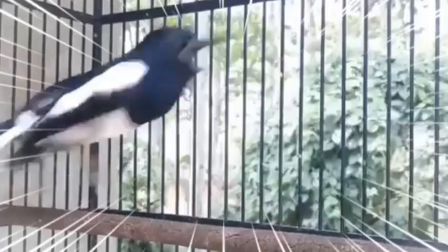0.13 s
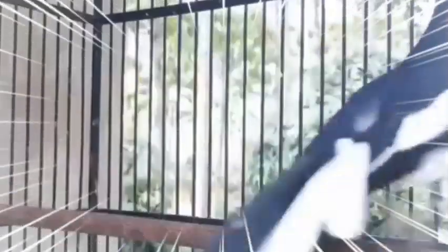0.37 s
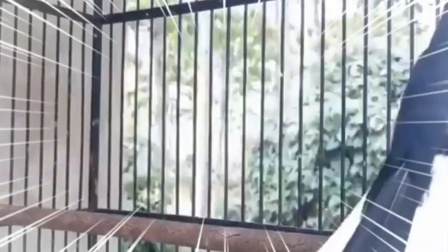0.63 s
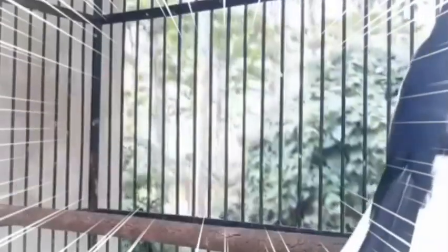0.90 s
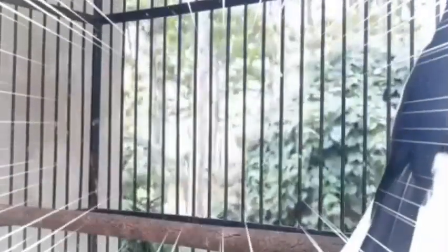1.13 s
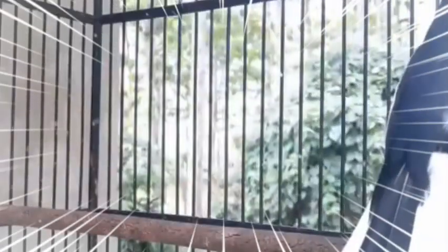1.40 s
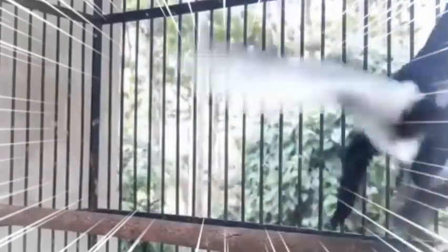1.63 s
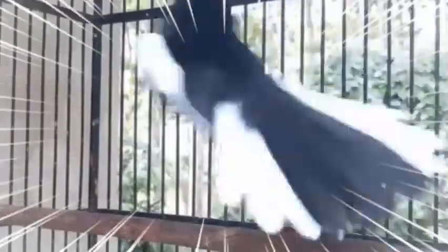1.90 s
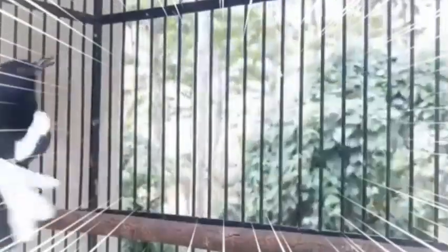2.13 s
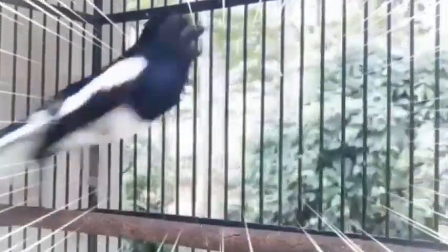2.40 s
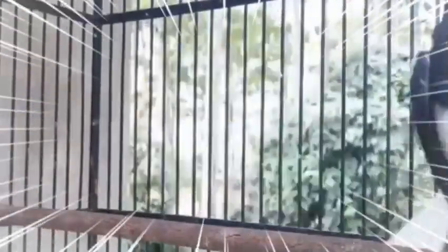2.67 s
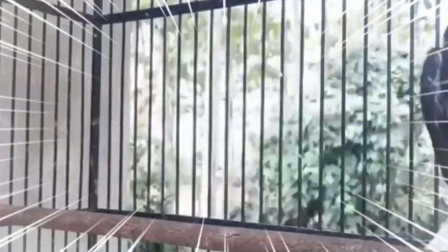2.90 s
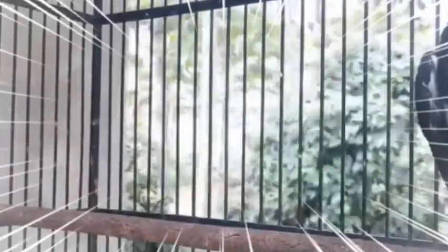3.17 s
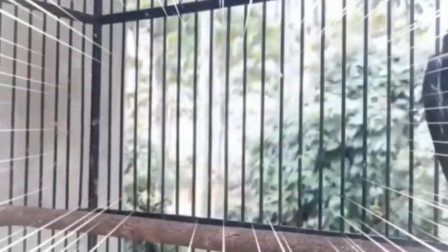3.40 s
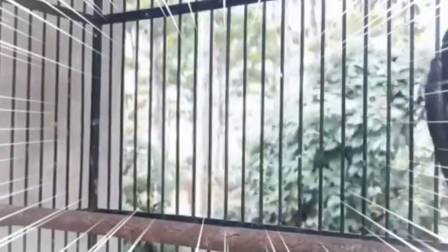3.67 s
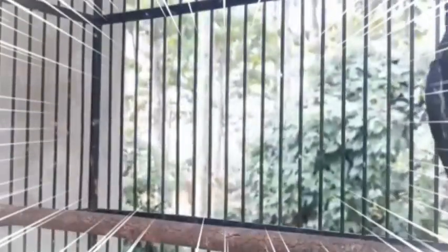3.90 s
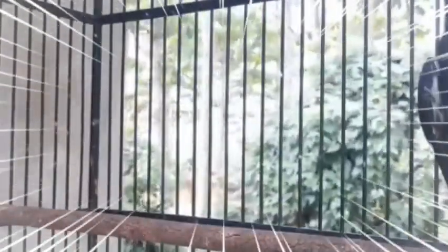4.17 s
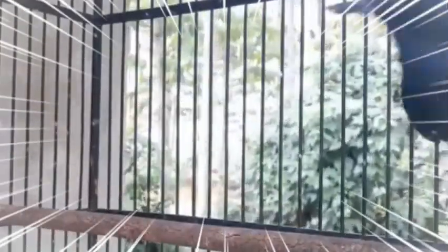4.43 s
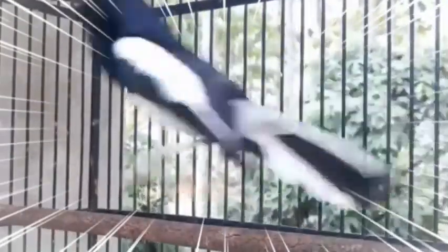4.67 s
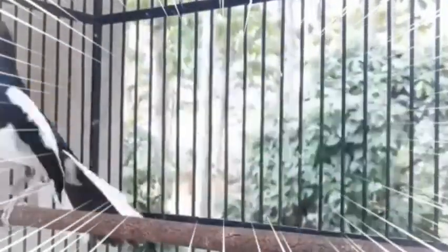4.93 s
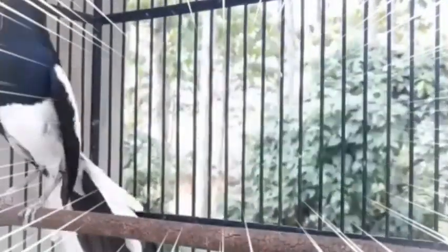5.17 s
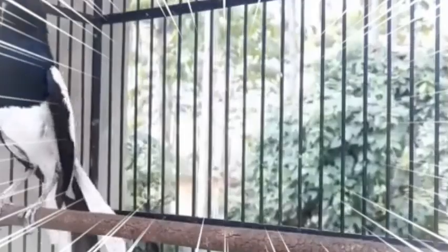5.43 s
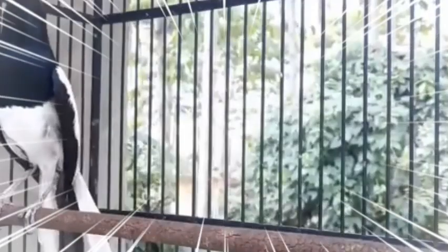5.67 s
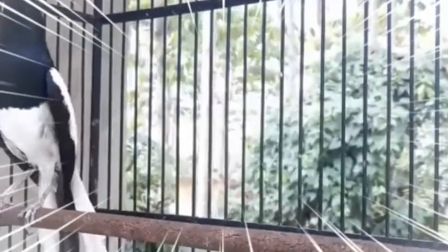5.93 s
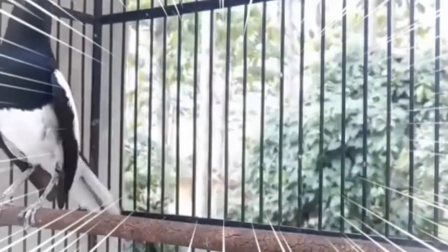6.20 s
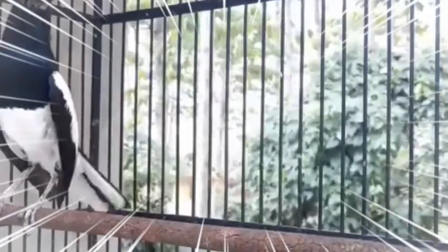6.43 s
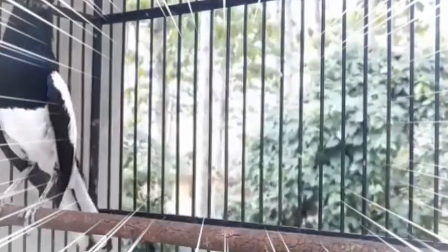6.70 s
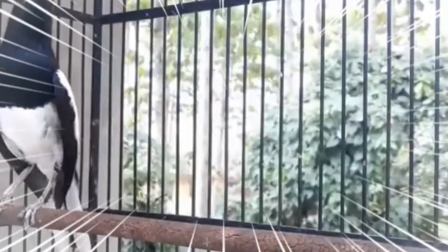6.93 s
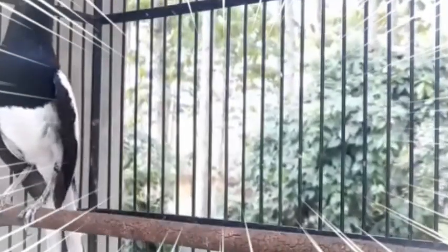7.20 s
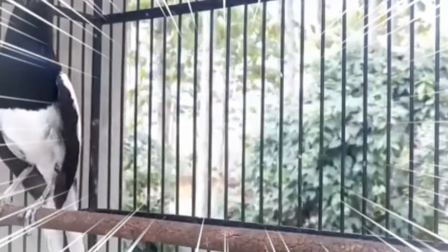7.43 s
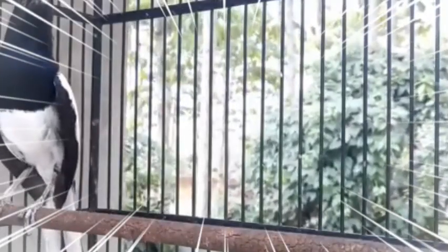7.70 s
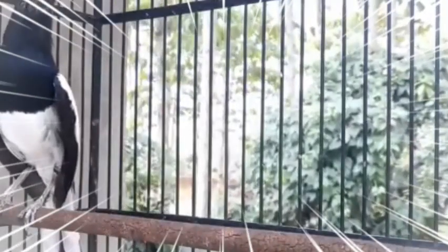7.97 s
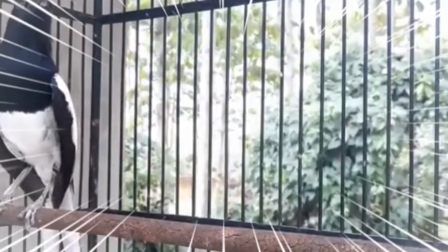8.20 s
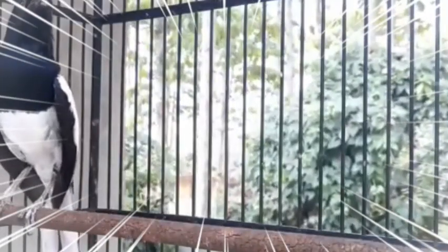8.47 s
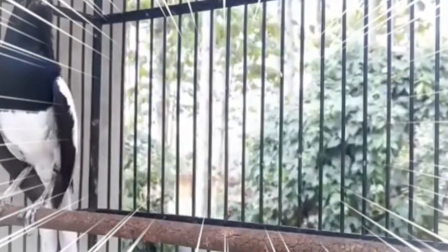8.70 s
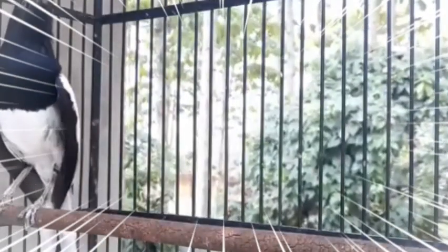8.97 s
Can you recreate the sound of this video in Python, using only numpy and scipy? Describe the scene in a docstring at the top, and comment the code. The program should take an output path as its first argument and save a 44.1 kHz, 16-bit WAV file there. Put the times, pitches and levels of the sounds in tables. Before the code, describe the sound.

After a split second of silence, a small songbird close to the microphone bursts into hoarse notes and sharp whistles under a fading high hiss. A regular row of scratchy rasps follows, then falling slurs, rapid trills and dry chacks. Winding whistles, a warble and a faint perch thump lead to more slurs and rasps. A quiet yard with short echo and low hum lies behind; the loudest notes slightly overload.

```python
"""After a moment of silence a caged songbird sings close by, both sides of its voice box at work: hoarse notes
and whistles under a fading hiss, arched rasps, then slurs, trills and harsh chacks. Winding whistles, hooked notes,
a warble, a perch thump and upsweeps follow, then more slurs and rasps; overlapping lines sound like a second bird.
Voices are near sines on drawn pitch curves; rasps add noise, chacks are noise through drifting resonances. Far notes,
cooing, hum and a yard's short echo lie behind throughout; the loudest notes overload the input."""
import sys
import numpy as np
from scipy import signal
from scipy.fft import rfft, irfft
from scipy.io import wavfile
from scipy.ndimage import uniform_filter1d

SR = 44100
rng = np.random.default_rng(int(sys.argv[2]) if len(sys.argv) > 2 else 0)


def ratio(d):
    """dB to gain"""
    e = np.asarray(d, float) / 20
    return 10 ** e


def pcm_store(signal):
    """Save signal as 16-bit PCM."""
    levels = np.round(np.clip(np.atleast_2d(signal), -1, 1) * 32767)
    wavfile.write(sys.argv[1], SR, levels.astype(np.int16).T)


N = 400869  # length [samples]

# whistles that slide and swell: (time [s], length [s], from [Hz], to [Hz], last level [dB], second harmonic [dB])
SWELLS = [(0.888, 0.058, 2995, 3780, -19.5, -31), (2.274, 0.1, 4880, 3370, -12, -21.5),
          (2.663, 0.16, 1300, 2200, -29.5, 4.5), (2.68, 0.083, 2830, 3670, -20.5, -6),
          (3.862, 0.078, 2220, 1996, -16, -33), (4.246, 0.16, 2585, 2836, -17.5, -19.5),
          (8.946, 0.057, 2050, 1876, -16.5, -15)]
# whistles that scoop onto a pitch: (time [s], length [s], from [Hz], held [Hz], level [dB], second harmonic [dB])
HOLDS = [(0.244, 0.056, 3050, 2842, -10, -8), (0.343, 0.036, 2580, 3420, -11, -20),
         (0.647, 0.052, 2610, 2790, -29, 3), (2.825, 0.13, 3600, 3906, -21, -17),
         (4.023, 0.094, 1670, 1829, -17.5, -23), (4.124, 0.25, 3490, 3700, -34, -47),
         (7.787, 0.13, 2145, 2062, -16, -39)]
# chirps that die away: (time [s], length [s], from [Hz], to [Hz], peak level [dB], second harmonic [dB])
CHIRPS = [(0.773, 0.079, 2896, 3046, -15.5, -11), (1.968, 0.095, 2770, 3120, -11.5, -12),
          (2.074, 0.078, 4440, 4980, -7.5, -30), (2.09, 0.082, 2855, 3335, -14.5, -34.5),
          (3.01, 0.051, 2633, 2723, -11, -20), (3.147, 0.049, 1970, 2116, -11.5, -32),
          (8.539, 0.061, 2200, 2020, -9.5, -30)]
# whistles arching like a thrown stone: (time [s], length [s], from [Hz], top [Hz], to [Hz], level [dB])
ARCHES = [(3.802, 0.046, 2266, 2400, 2220, -12.5), (5.486, 0.075, 2487, 3176, 2410, -9),
          (8.38, 0.087, 2606, 2763, 2254, -11.5), (8.911, 0.042, 2500, 3208, 2750, -6.5)]
# plain slides at one level: (time [s], length [s], from [Hz], to [Hz], level [dB])
SLIDES = [(5.052, 0.014, 5700, 4300, -8.5), (3.2, 0.028, 2343, 2420, -17),
          (3.097, 0.055, 2520, 2100, -22.5), (8.275, 0.039, 2420, 2097, -13.5)]
# sudden two-voiced drops: (time [s], upper from [Hz], lower from [Hz], level [dB])
DROPS = [(7.203, 3990, 2324, -13), (7.483, 3770, 2220, -12), (7.738, 3300, 2200, -13)]
# winding whistles: (second harmonic [dB], rows of (time [s], pitch [Hz], level [dB]))
PHRASES = [(-32, [(.145, 4776, -5.5), (.217, 4680, -8), (.228, 4800, -20)]), (-18, [(.135, 2450, -23),
           (.155, 2470, -17.5), (.175, 2650, -43)]), (-25, [(.672, 4200, -14), (.685, 4720, -22.5),
           (.7, 4596, -11.5), (.735, 4650, -10)]), (-22.5, [(4.475, 3443, -25.5), (4.52, 3460, -11.5),
           (4.67, 3516, -19.5), (4.77, 3389, -9), (4.812, 3362, -19.5)]), (-31.5, [(6.415, 4824, -17.5),
           (6.471, 4740, -6.5), (6.69, 4713, -11.5)]), (-19, [(8.67, 2077, -36), (8.702, 2696, -11.5),
           (8.742, 2765, -9.5), (8.758, 2480, -12.5)]), (-22.5, [(8.835, 1583, -48), (8.863, 2170, -15),
           (8.875, 2534, -18), (8.919, 2290, -16.5), (8.935, 1940, -40)]), (-9.5, [(4.91, 2965, -29),
           (5.006, 2870, -18.5), (5.198, 2924, -24.5)]), (-28.5, [(1.925, 4500, -4), (1.945, 4860, -9.5),
           (1.953, 4000, -20), (1.973, 3810, -3), (1.993, 3830, -59)]), (7, [(2.38, 2327, -19),
           (2.416, 2183, -27.5), (2.488, 2360, -21)]), (-14.5, [(2.485, 3630, -18), (2.509, 4186, -22.5),
           (2.573, 3970, -16.5), (2.601, 3730, -40), (2.629, 4200, -8.5), (2.641, 4680, -18)]),
           (-11, [(5.14, 1599, -46), (5.18, 1917, -20), (5.224, 2315, -25.5), (5.268, 2990, -20),
           (5.396, 3152, -24), (5.656, 3250, -28), (5.745, 3357, -31), (5.79, 3200, -30.5),
           (6.172, 3726, -35), (6.24, 3790, -26.5), (6.3, 3604, -30), (6.36, 3900, -31), (6.412, 3675, -7),
           (6.45, 3810, -28.5), (6.608, 3700, -35)]), (-20.5, [(6.62, 4445, -11), (6.716, 4075, -15),
           (6.756, 3686, -12), (6.816, 3657, -10.5), (6.868, 3685, -56)]), (-19.5, [(8.025, 3400, -10.5),
           (8.065, 3655, -9.5), (8.133, 3053, -8), (8.169, 2973, -20), (8.193, 2640, -15.5),
           (8.217, 2615, -11), (8.249, 2450, -35)])]
# hoarse notes: (time [s], length [s], from [Hz], to [Hz], level [dB], last shake [0-1])
HOARSE = [(0.124, 0.032, 4200, 3430, -19, 0.92), (0.221, 0.033, 4390, 3970, -12, 0.84),
          (0.367, 0.08, 3810, 4940, -13.5, 0.67), (0.667, 0.026, 4130, 3680, -25, 1),
          (0.73, 0.057, 4970, 3390, -15, 0.1), (0.911, .075, 3730, 4610, -22, 0.83),
          (6.435, 0.64, 2648, 2490, -48, 0.75)]
# both membranes of a hoarse note: (share of pitch, added level [dB])
HOARSE_PAIR = [(1.03, 2.5), (.8, -9.5)]
# hooked notes, flicking down onto a held pitch and plunging: (time [s], length [s], level [dB], last pitch [Hz])
HOOKS = [(4.783, 0.074, -5, 3390), (4.978, 0.063, -5, 4700)]
# a firm note that breaks into a slow warble: (time [s], length [s], from [Hz], to [Hz], level [dB])
QUAVER = (5.71, .145, 5330, 4980, -10.5)
# a short buzz rich in overtones: (time [s], length [s], fundamental [Hz], level per overtone [dB])
BUZZ = (2.681, .016, 712, -31)
# two-voiced slurs that end in a drop: (time [s], length [s], level [dB])
SLURS = [(2.713, 0.096, -16), (2.899, 0.081, -14.5), (3.086, 0.09, -15.5), (3.327, 0.12, -16),
         (3.541, 0.095, -12.5), (6.874, 0.082, -14), (7.086, 0.091, -15.5), (7.28, 0.089, -14.5)]
# course of a slur: (share of length, upper [Hz], lower [Hz], upper added level [dB], lower added level [dB])
SLUR_SHAPE = [(0, 4950, 4650, -19, -8.5), (0.302, 4644, 4284, -3.5, -3), (0.719, 4370, 3775, -8.5, -4),
              (0.852, 3870, 2900, -19.5, -17.5), (1, 2940, 1410, -60, -27)]
# quick two-voiced upsweeps: (time [s], level [dB])
UPSWEEPS = [(5.897, -28), (6.005, -28), (6.139, -33)]
# course of an upsweep: (time after onset [s], lower [Hz], upper [Hz], added level [dB])
UPSWEEP_SHAPE = [(0, 1756, 2200, -15), (.016, 2194, 3174, 4.5), (0.03, 2780, 3913, 7),
                 (.055, 2700, 3800, -28)]
# trills of gliding pips: (first pip time [s], last pip time [s], nominal period [s], pip length [s],
# from [Hz], to [Hz], first level [dB], last level [dB])
TRILLS = [(3.403, 3.539, .0455, .026, 5700, 2700, -9, -11), (3.427, 3.577, .05, .009, 4000, 3900, -7, -9),
          (3.376, 3.596, .0315, .009, 5000, 4700, -8, -10), (5.081, 5.121, .02, .012, 8200, 5300, -24, -25),
          (5.078, 5.216, .0276, .014, 4300, 4300, -20, -13),
          (5.254, 5.396, .0355, .02, 4850, 4150, -8, -11), (5.205, 5.235, .015, .012, 3000, 4200, -15, -17),
          (5.428, 5.444, .016, .018, 3900, 3000, -11, -14), (6.674, 6.83, .0195, .012, 5100, 4300, -6, -22),
          (6.683, 6.8, .0195, .014, 4700, 3900, -10, -16)]
# air past the beak: (frequency [Hz], relative level [dB per Hz])
BREATH = [(1000, -58), (2500, -9.5), (4500, -18.5), (7600, -2.5), (8500, -20.5), (12000, -9.5),
          (15700, -26)]
# arched rasps: (time [s], length [s], nominal top [Hz], last pitch [Hz], level [dB])
RASPS = [(1.515, 0.072, 3725, 2956, -16), (1.646, 0.067, 3240, 2120, -16.5),
         (1.764, 0.065, 3020, 2470, -17.5), (1.875, 0.075, 3024, 2430, -15),
         (1.976, 0.059, 2835, 2200, -13), (2.078, 0.066, 3166, 2180, -14), (2.194, 0.055, 3005, 2310, -14),
         (2.301, 0.066, 3044, 2256, -16), (2.417, 0.062, 3300, 2390, -17),
         (2.546, 0.065, 3980, 2940, -17.5), (7.526, 0.079, 3670, 1995, -14.5),
         (7.669, 0.077, 3400, 2200, -14.5), (7.78, 0.08, 2978, 2070, -13.5),
         (7.9, 0.062, 2914, 2290, -12.5), (8.008, 0.056, 2984, 2190, -15), (8.121, 0.048, 2930, 1990, -17),
         (8.226, 0.054, 3140, 1610, -18), (8.337, 0.059, 3180, 2200, -22.5),
         (8.45, 0.056, 3400, 2510, -14.5), (8.574, 0.073, 3450, 2200, -13),
         (8.699, 0.065, 3630, 2510, -16.5)]
# turbulent air in a rasp: (frequency [Hz], relative level [dB per Hz])
RASP_BREATH = [(1000, -31), (2000, -18), (3900, -8), (5000, -32), (6300, -5.5), (7900, -14), (8200, -31),
               (15700, -21)]
# harsh chacks: (time [s], level [dB], decay t60 [s])
CHACKS = [(3.732, -12, 0.12), (3.785, -7.5, 0.054), (3.798, -16, 0.13), (3.853, -18.5, 0.17),
          (3.864, -12.5, 0.081), (3.933, -12, 0.13), (3.994, -14, 0.046), (4.006, -14, 0.15),
          (4.076, -15.5, 0.12), (4.843, -26.5, 0.22)]
# a drawn-out chack under the trill: (time [s], length [s], level [dB])
RATTLE = (3.378, .27, -25)
# throat resonances of a chack: (mean centre [Hz], width [Hz], relative level [dB])
THROAT = [(2200, 133, -13.5), (3400, 650, -6), (4200, 350, -7.5), (4800, 390, -1.5), (6300, 3100, -5.5),
          (12000, 6800, -14.5)]
# faint notes of a far bird: (time [s], length [s], from [Hz], to [Hz], level [dB])
FAR_NOTES = [(2.55, 0.16, 1323, 1227, -46), (4.842, 0.16, 1955, 2000, -47), (6.2, 0.16, 1650, 1760, -52),
             (6.325, .11, 2024, 2097, -39.5), (6.675, .085, 1620, 1740, -46.5),
             (6.753, .16, 1900, 2000, -47), (9.02, 0.07, 1100, 1170, -50)]
# faint far cooing: (time [s], length [s], pitch [Hz], peak level [dB])
COOS = [(3.68, 0.38, 348, -48.5), (5.886, 0.42, 423, -49)]
# a landing on the perch: (time [s], level [dB], decay t60 [s], top [Hz])
THUMP = (5.812, -40, .2, 600)
# a high hiss that fades early on: (time [s], level [dB])
HISS = [(.4, -38), (.6, -34.5), (1.4, -51.5), (2.5, -62.5)]
# low hum of the neighbourhood: (frequency [Hz], relative level [dB per Hz])
HUM = [(25, -22.5), (70, -16.5), (135, 1), (210, -12.5), (800, -23), (2500, -31), (4500, -24), (8000, -59),
       (15000, -64)]
# how much of the treble's power takes a repeated pattern: (frequency [Hz], share of power)
REPEAT_SHARE = [(10300, .25), (11300, .95)]


def evened(x):
    """Scales a sound to rms 1."""
    return x / np.sqrt(np.mean(x ** 2) + 1e-20)


def add(mix, s, sound):
    """Lays a sound into the mix at s seconds, cut at the end of the mix."""
    part = mix[round(s * SR):][:len(sound)]
    part += sound[:len(part)]


def coloured(points):
    """Noise of rms 1 with the given spectrum."""
    f, db = np.transpose(points)
    hz = np.fft.rfftfreq(N, 1 / SR)
    curve = ratio(np.interp(np.log(hz + 1), np.log(f), db))
    return evened(irfft(rfft(rng.standard_normal(N)) * curve, N))


def wobble(count, hz):
    """Random wavering of rms 1 with rates up to about hz."""
    lowpass = signal.butter(2, hz, fs=SR, output="sos")
    return evened(signal.sosfilt(lowpass, rng.standard_normal(count + 2000))[2000:])


def add_voice(tones, air, s, hz, db, first_db=0, second_db=-22, third_db=-23, shake=0, breath_db=-48, fuzz=0.12):
    """One membrane: a near sine on a pitch curve; shake adds warble and throb, fuzz blurs the second harmonic."""
    t = np.arange(s[0], s[-1], 1 / SR)
    count = len(t)
    shake = np.interp(t, s, shake * np.ones(len(s)))
    # a warble at an uneven rate around 240 Hz
    warble = np.sin(2 * np.pi * np.cumsum(240 * (1 + 0.247 * wobble(count, hz=64))) / SR)
    drift = (0.003 + 0.01 * shake) * wobble(count, hz=60)
    hz = np.interp(t, s, hz) * (1 + drift + 0.13 * shake * warble)
    edge = np.clip(np.minimum(t - t[0], t[-1] - t) / 0.004, 0, 1)
    # the throb dips deeply but never leaps far above the mean level
    throb_db = (1 + 13 * shake) * np.minimum(wobble(count, hz=220), 0.8)
    level = ratio(np.interp(t, s, db)) * edge
    turn = 2 * np.pi * (np.cumsum(hz) / SR + rng.random())
    blur = wobble(count, hz=500)
    second = ratio(np.interp(t, s, second_db * np.ones(len(s)))) * (1 - fuzz + fuzz * blur)
    third = ratio(third_db) * (0.16 + 0.3 * blur) * ratio(-18 * (3 * hz > 13000))  # weaker above 13 kHz
    tone = ratio(first_db) * np.sin(turn) + second * np.sin(2 * turn) + third * np.sin(3 * turn)
    add(tones, s[0], np.sqrt(2) * level * ratio(throb_db) * tone)
    add(air, s[0], level * ratio(breath_db))


def song():
    """All voiced notes but the rasps, with breath noise that follows their level."""
    tones, air = np.zeros(N), np.zeros(N)
    for notes in whistles, drops, rough_notes, hooks, quaver, buzz, slurs, upsweeps, trills, far_bird:
        notes(tones, air)
    keep = np.exp(-1 / (0.005 * SR))  # the breath lingers about 5 ms after each note
    return tones + signal.lfilter([1 - keep], [1, -keep], air) * coloured(BREATH)


def whistles(tones, air):
    """Clear notes of one membrane; each kind shares one law for pitch and level."""
    u = np.linspace(0, 1, num=25)
    for s, length, from_hz, to_hz, db, second_db in SWELLS:
        hz = to_hz + (from_hz - to_hz) * (1 - u) ** 1.25  # the slide slows towards its end
        add_voice(tones, air, s + length * u, hz, db - 17 * (1 - u) ** 2, second_db=second_db)
    for s, length, from_hz, held_hz, db, second_db in HOLDS:
        scoop = np.exp(-length * u / 0.02)
        hz = held_hz + (from_hz - held_hz) * scoop
        add_voice(tones, air, s + length * u, hz, db - 6.5 * scoop, second_db=second_db)
    for s, length, from_hz, to_hz, db, second_db in CHIRPS:
        hz = to_hz + (from_hz - to_hz) * (1 - u) ** 2.3
        shape_db = np.interp(u, [0, 0.4, 1], [-9, 0, -44.5])
        add_voice(tones, air, s + length * u, hz, db + shape_db, second_db=second_db)
    for s, length, from_hz, top_hz, to_hz, db in ARCHES:
        up, down = np.sqrt(abs(top_hz - from_hz)), np.sqrt(abs(top_hz - to_hz))
        hz = top_hz - ((up + down) * u - up) ** 2
        sink_db = 44 * np.log2(hz / top_hz)  # 44 dB per octave below the top
        add_voice(tones, air, s + length * u, hz, db + sink_db, second_db=-25)
    for s, length, from_hz, to_hz, db in SLIDES:
        add_voice(tones, air, s + length * u, from_hz + (to_hz - from_hz) * u, db + 0 * u, second_db=-19.5)
    for second_db, rows in PHRASES:
        add_voice(tones, air, *np.transpose(rows), second_db=second_db)


def drops(tones, air):
    """Both membranes fall suddenly, the upper easing towards its end, the lower in a longer straight slide."""
    u = np.linspace(0, 1, num=25)
    length, ease_s = 0.027, 0.01
    upper_end_hz, lower_end_hz = 2508, 2077  # the upper one only nears its end pitch
    for s, upper_hz, lower_hz, db in DROPS:
        hz = upper_end_hz + (upper_hz - upper_end_hz) * np.exp(-length * u / ease_s)
        add_voice(tones, air, s + length * u, hz, db + 0 * u, second_db=-18, shake=0.075, fuzz=1)
        hz = lower_end_hz + (lower_hz - lower_end_hz) * (1 - u)
        add_voice(tones, air, s + 1.3 * length * u, hz, db - 5.5 - 9 * (1 - u), second_db=-8, shake=0.3, fuzz=0.79)


def rough_notes(tones, air):
    """Hoarse notes: two membranes whose pitch shakes fast, and more and more."""
    u = np.linspace(0, 1, num=25)
    shape_db = np.interp(u, [0, 0.58, 1], [0, 0, -14.5])
    for s, length, from_hz, to_hz, db, shake in HOARSE:
        hz = from_hz + (to_hz - from_hz) * u
        for share, added_db in HOARSE_PAIR:
            add_voice(tones, air, s + length * u, share * hz, db + added_db + shape_db, second_db=-26,
                      shake=shake * (0.5 + 0.5 * u), breath_db=-22, fuzz=1)


def hooks(tones, air):
    """Hooked notes: pitch flicks down, holds and plunges, with a tone about an octave below until the plunge."""
    from_hz, held_hz, shake = 6900, 6040, 0.21
    for s, length, db, last_hz in HOOKS:
        at = np.array([0, 0.01, length - 0.014, length])
        add_voice(tones, air, s + at, [from_hz, held_hz, held_hz, last_hz],
                  db + np.array([-26, -7.5, -3.5, -13.5]), second_db=-17.5, shake=shake, breath_db=-18.5, fuzz=0.59)
        add_voice(tones, air, s + at[:3], [from_hz / 2 + 300, held_hz / 2, held_hz / 2],
                  db + np.array([-22, -15, -22]), second_db=-39, shake=shake)


def quaver(tones, air):
    """A firm note whose pitch and level break into an ever deeper sawtooth warble."""
    s, length, from_hz, to_hz, db = QUAVER
    t = np.arange(0, length, 0.001)
    depth = 1.05 * (t / length) ** 2
    saw = (64 * t) % 1  # 64 Hz
    hz = (from_hz + (to_hz - from_hz) * t / length) * (1 + 0.3 * depth * (0.5 - saw))
    level_db = db - 9 * (1 - t / length) ** 2 - 30 * depth * (2 * saw - 1) ** 2
    add_voice(tones, air, s + t, hz, level_db, second_db=-30.5, breath_db=-33)


def buzz(tones, air):
    """A short buzz of the third to eighth harmonics at equal level."""
    u = np.linspace(0, 1, num=25)
    s, length, hz, db = BUZZ
    for k in range(3, 9):
        add_voice(tones, air, s + length * u, k * hz + 0 * u, db + 0 * u, second_db=-40)


def slurs(tones, air):
    """Both membranes slide down side by side with blurred overtones, then drop away."""
    share, upper_hz, lower_hz, upper_db, lower_db = np.transpose(SLUR_SHAPE)
    for s, length, db in SLURS:
        at = s + length * share
        add_voice(tones, air, at, upper_hz, db + upper_db, second_db=-17.5, shake=0.21, breath_db=-24, fuzz=0.94)
        add_voice(tones, air, at, lower_hz, db + lower_db, second_db=-15, shake=0.22, breath_db=-22, fuzz=1)


def upsweeps(tones, air):
    """Both membranes sweep up quickly; the lower one is strongest in its second harmonic."""
    after, lower_hz, upper_hz, shape_db = np.transpose(UPSWEEP_SHAPE)
    for s, db in UPSWEEPS:
        add_voice(tones, air, s + after, upper_hz, db + shape_db, second_db=-5, third_db=-17, breath_db=-10)
        add_voice(tones, air, s + after, lower_hz, db + shape_db - 10, second_db=5)


def trills(tones, air):
    """Rows of short gliding pips, each swelling early in its glide."""
    u = np.linspace(0, 1, num=21)
    for s, end, period, length, from_hz, to_hz, first_db, last_db in TRILLS:
        glide = to_hz + (from_hz - to_hz) * (1 - u) ** 1.8
        for at in np.linspace(s, end, num=round((end - s) / period) + 1):
            db = np.interp(at, [s, end], [first_db, last_db]) - 22 * (u - 0.2) ** 2
            late, sharp, loud = rng.standard_normal(3)  # no two pips are quite alike
            add_voice(tones, air, at + 0.04 * period * late + length * u, glide * (1 + 0.028 * sharp), db + loud,
                      second_db=-19, third_db=-18, shake=0.12, breath_db=-24, fuzz=0.7)


def rasps():
    """A burst of air; inside it both membranes arch in pitch, the higher the arch, the more it shakes."""
    tones, air, u = np.zeros(N), np.zeros(N), np.linspace(0, 1, num=21)
    for s, length, top_hz, last_hz, db in RASPS:
        top, tilt_db, lower = rng.uniform([0.3, -6, 0.8], [0.55, 6, 0.92])  # no two are alike
        rising = 0.4 * top_hz * (1 - u / top) ** 2  # starts at 0.6 of the top pitch
        falling = (top_hz - last_hz) * ((u - top) / (1 - top)) ** 2
        below = np.where(u < top, rising, falling)
        below += 0.0697 * top_hz * abs(uniform_filter1d(rng.standard_normal(len(u)), size=3))  # uneven arch
        shake = np.clip((top_hz - 2750) / 1500, 0.3, 0.65)
        # the tone breaks up at random along the arch; the octave is strong only near the top
        arch_db = db + tilt_db * (u - 0.5) + 3 - 7 * abs(rng.standard_normal((2, len(u))))
        octave_db = -33 * np.maximum(below, 0) / top_hz * np.where(u < top, 2, 1)
        membranes = (u, 1, arch_db[0]), (0.12 + 1.17 * u, lower, arch_db[1] - 4)
        for late, share, level_db in membranes:
            add_voice(tones, air, s + length * late, share * (top_hz - below), level_db, first_db=-15.5,
                      second_db=-0.5 + octave_db, third_db=-26, shake=shake, breath_db=-67)
        burst = signal.windows.tukey(round(1.47 * length * SR), 0.35)
        tilt = tilt_db * np.linspace(-0.5, 0.5, len(burst))
        add(air, s - 0.004, burst * ratio(db - 16.5 + tilt))
    flutter = ratio(3.5 * np.tanh(wobble(N, hz=200)))
    return tones + air * flutter * coloured(RASP_BREATH)


def resonate(x, hz, width):
    """Shifts the curve hz down to zero, smooths twice, and shifts back: a steep moving resonance."""
    turn = np.exp(2j * np.pi * np.cumsum(hz) / SR)
    r = np.exp(-np.pi * width / SR)
    return 2 * (turn * signal.lfilter([(1 - r) ** 2], [1, -2 * r, r ** 2], x / turn)).real


def chacks():
    """Turbulent air, let through in uneven puffs, rings a throat whose resonances keep drifting."""
    level, t = np.zeros(N), np.arange(SR // 5) / SR
    for s, db, t60 in CHACKS:
        add(level, s, ratio(db - 60 * t / t60) * np.minimum(t / 0.008, 1))
    s, length, db = RATTLE
    add(level, s, ratio(db) * signal.windows.tukey(round(length * SR), 0.2))
    turns = np.cumsum(700 * (1 + 0.12 * wobble(N, hz=40))) / SR  # puffs at about 700 Hz
    puffs = (0.3 + np.exp(-5 * (turns % 1))) * rng.standard_normal(N)
    throat = np.zeros(N)
    for hz, width, db in THROAT:
        strength = ratio(db + 4 * wobble(N, hz=30))
        throat += strength * evened(resonate(puffs, hz * (1 + 0.06 * wobble(N, hz=20)), width))
    return level * ratio(3 * np.tanh(wobble(N, hz=150)) + 4.5) * evened(throat)


def far_bird(tones, air):
    """A far bird's faint sliding notes, a little softer at both ends."""
    u = np.linspace(0, 1, num=25)
    for s, length, from_hz, to_hz, db in FAR_NOTES:
        hz = from_hz + (to_hz - from_hz) * u
        add_voice(tones, air, s + length * u, hz, db - 8 * (2 * u - 1) ** 2, shake=0.05)


def echo(x):
    """Sparse reflections of random sign that die away, t60 0.16 s."""
    taps = np.zeros(SR // 2)
    at = np.arange(200, len(taps) - 20, 20)
    sign = rng.choice([-1., 1.], len(at))
    taps[at + rng.integers(0, 20, len(at))] = sign * ratio(-60 * at / SR / 0.16)
    return signal.fftconvolve(x, taps / np.linalg.norm(taps))[:N]


def perch_thump():
    """A landing on the perch: a dull burst of low noise that dies away."""
    out, t = np.zeros(N), np.arange(SR // 5) / SR
    s, db, t60, hz = THUMP
    add(out, s, ratio(db - 60 * t / t60) * np.minimum(t / 0.004, 1) * wobble(len(t), hz=hz))
    return out


def cooing():
    """Faint far coos: steady sines that swell and sink."""
    out = np.zeros(N)
    for s, length, hz, db in COOS:
        t = np.arange(0, length, 1 / SR)
        add(out, s, ratio(db) * np.sqrt(2) * np.sin(np.pi * t / length) * np.sin(2 * np.pi * hz * t))
    return out


def hiss():
    """High noise that wavers in level and fades early on."""
    s, db = np.transpose(HISS)
    level_db = np.interp(np.arange(N) / SR, s, db) + 3.2 * wobble(N, hz=10)
    return ratio(level_db) * coloured([(1500, -47), (3000, -5.5), (6000, -1), (7200, 5.5), (8200, -11), (9500, -23)])


def hum():
    """Low noise of the neighbourhood that slowly swells a little."""
    return ratio(-44.5 + 1.5 * wobble(N, hz=3)) * coloured(HUM)


def scene():
    """Birds, their echo and the yard, the same in both channels."""
    voiced, rasped = song() + chacks(), rasps()
    echoes = ratio(-7) * echo(voiced + ratio(-5.5) * rasped)  # the rasps echo less than the other notes
    yard = perch_thump() + cooing() + hiss() + hum()
    return np.tile(voiced + rasped + echoes + yard, (2, 1))


def broad_power(z):
    """Power of a spectrogram smoothed over frequency and time."""
    return abs(uniform_filter1d(uniform_filter1d(abs(z) ** 2, size=7, axis=1), size=12, axis=2)) + 1e-14


def repeat_treble(x):
    """The treble keeps its broad level but takes part of its fine pattern from lower down; above it is silence."""
    hz, _, z = signal.stft(x, SR, nperseg=256, noverlap=192)
    first, step = round(8270 / hz[1]), round(7580 / hz[1])  # treble edge and distance down, Hz to bins
    top, lower = z[:, first:first + step], z[:, first - step:first]
    share = np.interp(hz[first:first + step, None], *np.transpose(REPEAT_SHARE))
    repeated = lower * np.sqrt(share * broad_power(top) / broad_power(lower))
    z[:, first:first + step] = repeated + top * np.sqrt(1 - share)
    z[:, first + step - 1:] = 0
    return signal.istft(z, SR, nperseg=256, noverlap=192)[1][:, :N]


def roll_off(x):
    """The treble ends steeply here."""
    return signal.sosfilt(signal.butter(12, 15780, fs=SR, output="sos"), x)


def record(dry):
    """The input opens after a moment of silence and bends near full scale; above about 8 kHz the treble repeats
    part of the fine pattern of a lower band, and the treble is limited."""
    opened = dry * np.clip((np.arange(N) / SR - 0.11) / 0.0066, 0, 1)
    knee = 14  # higher bends later and harder
    bent = opened / (1 + abs(opened) ** knee) ** (1 / knee)
    return roll_off(repeat_treble(bent))


dry = scene()
out = record(dry)
pcm_store(out)
```